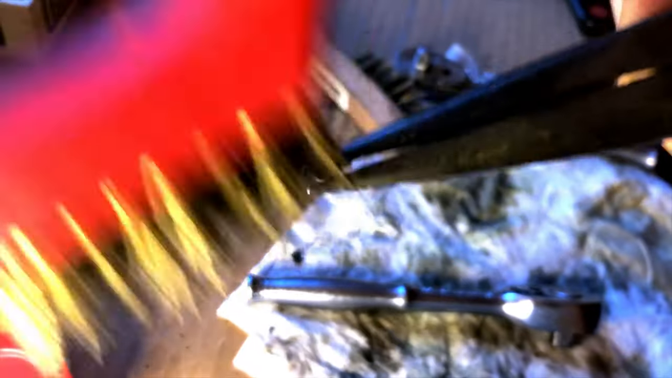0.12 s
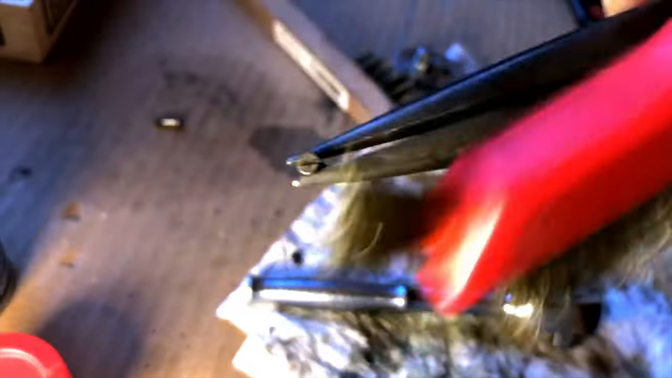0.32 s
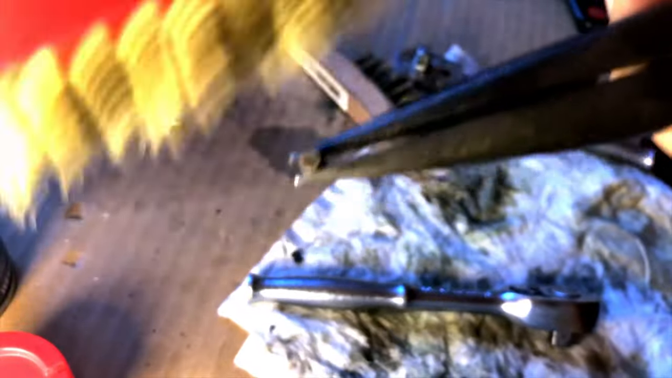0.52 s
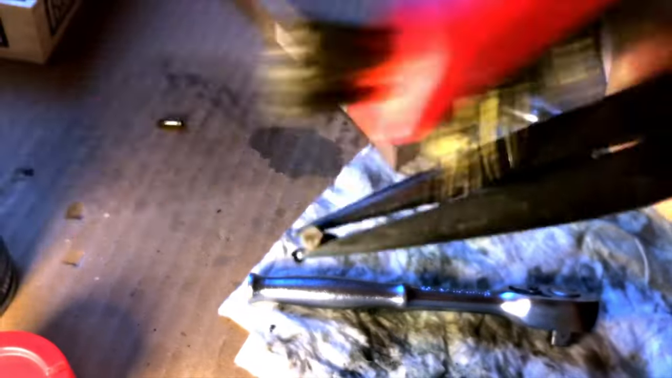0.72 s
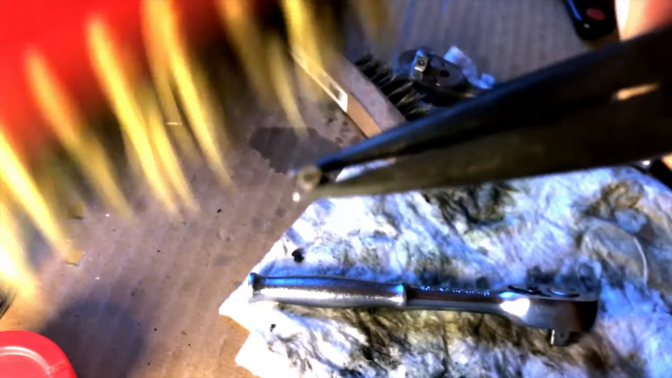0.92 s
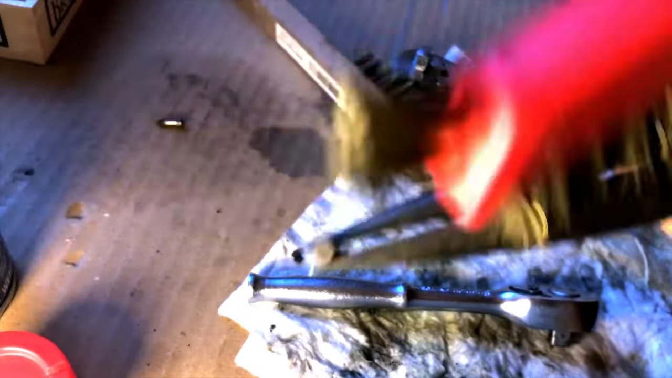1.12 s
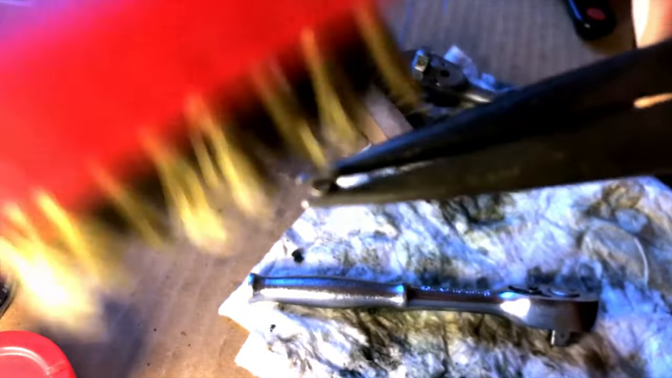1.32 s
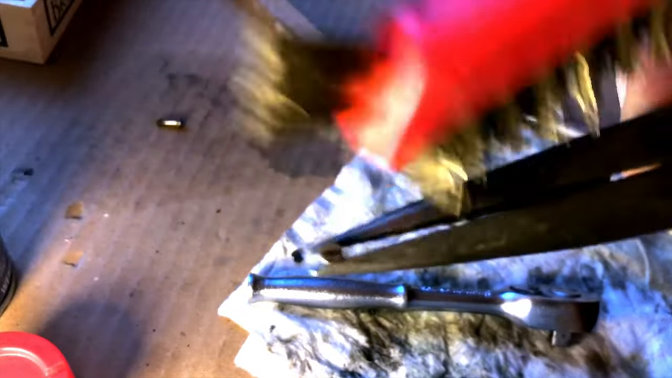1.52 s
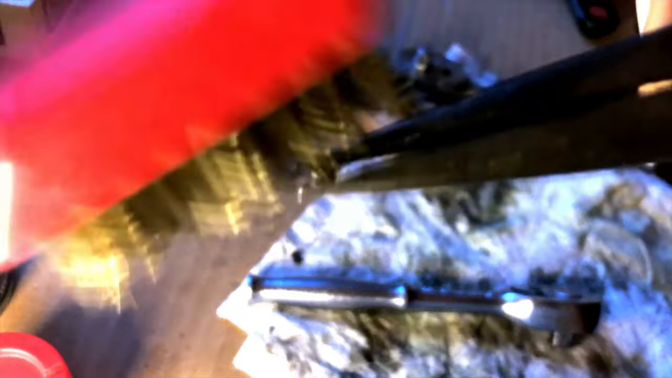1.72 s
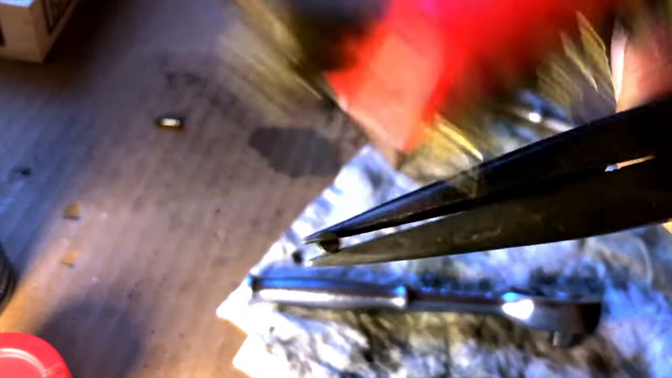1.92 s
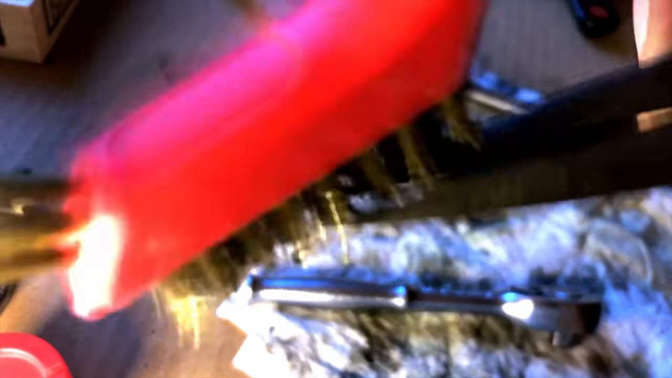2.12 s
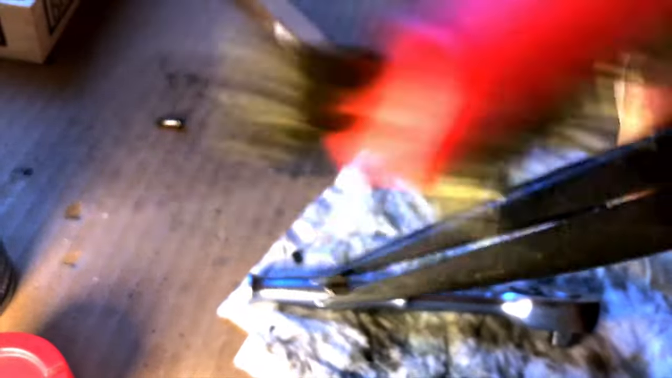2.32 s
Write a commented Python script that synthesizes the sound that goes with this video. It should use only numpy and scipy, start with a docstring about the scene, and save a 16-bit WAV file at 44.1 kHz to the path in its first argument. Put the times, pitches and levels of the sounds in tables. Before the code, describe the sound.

A wire brush scrubs a tiny metal screw gripped in pliers, close and dry. Faint bristle flicks come at 0.15 s, then a hard, loud click at 0.22 s with a dull juddering drag until about 0.33 s. Five bright scratchy strokes land at 0.6, 1.0, 1.38, 1.74 and 2.13 s, the last landing strongest; each ticks, rasps about 0.15 s and fades into low room drone with faint hiss.

```python
"""A low room drone with faint hiss, filtered noise, lies under a wire brush scrubbing a tiny screw in pliers.
Stray wires graze the screw: short bells of wire flicks. Then the brush hits the pliers with a hard click
(damped sines, noise crack, thud), drags dully along them (juddering noise) and slips off.
Five strokes follow: each lands with a tick (noise burst) that rings the pliers (short sine),
then scratches across the screw (dense random wire flicks) and thins out."""
import sys
import numpy as np
from scipy import signal
from scipy.fft import rfft, irfft, next_fast_len
from scipy.io import wavfile
from scipy.ndimage import map_coordinates

SR = 44100
rng = np.random.default_rng(int(sys.argv[2]) if len(sys.argv) > 2 else 0)


def master_out(mix):
    """Clip the mix to full scale and print it as 16-bit PCM to the path in sys.argv[1]."""
    frames = np.transpose(np.atleast_2d(mix))
    ceiling = np.clip(frames, -1, 1)
    pcm = np.round(ceiling * 32767).astype(np.int16)
    wavfile.write(sys.argv[1], SR, pcm)


N = 110250

TIME = np.arange(N) / SR
SIZE = next_fast_len(N + 8192)
FREQ = np.fft.rfftfreq(SIZE, 1 / SR)


def amp(db):
    """Decibels to gain."""
    return 10 ** (np.asarray(db) / 20)


def unit(x):
    """Scale to rms 1."""
    return x / np.sqrt(np.mean(x ** 2) + 1e-20)


def along(points):
    """Spectrum in dB: (Hz, dB) points joined on a log frequency axis."""
    hz, db = np.transpose(points)
    return np.interp(np.log(FREQ + 1), np.log(hz + 1), db)


def noise():
    """White noise, rms 1."""
    return rng.standard_normal(N)


def coloured(x, spectrum_db):
    """Filter x with a spectrum scaled to keep the power of white noise."""
    return irfft(rfft(x, SIZE) * unit(amp(spectrum_db)), SIZE)[:N]


def wander(position):
    """Smooth random curve, one knot per whole position."""
    return map_coordinates(rng.standard_normal(size=2048), [position], mode="wrap")


def swell(s, rise_s, fall_s):
    """Bell-shaped contact peaking at s."""
    width_s = np.where(TIME < s, rise_s, fall_s)
    return np.exp(-((TIME - s) / width_s) ** 2)


def decay(s, t60_s):
    """Damping: starts at s, falls 60 dB in t60_s."""
    return (TIME >= s) * np.exp(-np.log(1000) * np.maximum(TIME - s, 0) / t60_s)


# room drone: frequency_hz, relative_density_db
ROOM_SPECTRUM = [(20, -21.5), (40, -26), (62, -13), (85, -17.5), (115, -8), (152, 0.5), (190, -2),
                 (330, -7), (450, -18), (680, -27.5), (1000, -20.5), (1350, -20.5), (2000, -32.5),
                 (4000, -41.5), (8000, -48.5), (16000, -54)]
ROOM_DB = -43.5


def room():
    """Steady low drone with faint hiss: stationary filtered noise."""
    return amp(ROOM_DB) * coloured(noise(), along(ROOM_SPECTRUM))


WIRES_PER_S, WIRE_SCATTER_DB = 2400, 3
HISS_SHARE = 0.28  # power share of smooth friction


def wires(spectrum_db):
    """Random wire flicks of uneven size over smooth friction, about rms 1."""
    struck = rng.random(N) < WIRES_PER_S / SR
    sign = rng.choice([-1, 1], N)
    flicks = struck * sign * amp(WIRE_SCATTER_DB * noise())
    mix = np.sqrt(1 - HISS_SHARE) * unit(flicks) + np.sqrt(HISS_SHARE) * noise()
    return coloured(mix, spectrum_db)


# resonances and dips of screw and jaws: centre_hz, width_hz, lift_db
STEEL_RESONANCES = [(4180, 300, 6), (5850, 350, 4.5), (6820, 200, -2.5), (8070, 230, 3), (8920, 220, -7.5),
                    (9740, 380, 4.5)]
COLOUR_STEP_HZ = 257.2
GRIP_COLOUR_DB, LAND_COLOUR_DB = 1.05, 0.5  # every contact meets other wires


def steel(vary_db):
    """Resonances of screw and jaws in dB, redrawn slightly at each call."""
    modes = sum(db * np.exp(-((FREQ - hz) / width_hz) ** 2) for hz, width_hz, db in STEEL_RESONANCES)
    return modes + vary_db * wander(FREQ / COLOUR_STEP_HZ)


# light wire touch: frequency_hz, relative_db
LIGHT_TOUCH_SPECTRUM = [(60, -47), (700, -19.5), (1300, -1), (4000, -9), (6000, -6), (8000, -7.5),
                        (9900, -2), (12000, -4.5), (16000, -5.5)]
# stray wire contacts: peak_s, level_db, half_width_s
GRAZE_EVENTS = [(.1540, -42.5, .0018), (0.165, -47.5, 0.0048), (.208, -50, 0.02), (.326, -58.5, 0.0049),
                (.369, -52.5, 0.00383), (0.737, -44.5, 0.0075), (.774, -61.5, .007), (.9953, -35, 0.0011),
                (1.761, -39, 0.00265), (1.867, -37, .002)]


def grazes():
    """Stray wires flick the screw: bell-shaped contacts gate wire flicks."""
    touch = sum(amp(db) * swell(s, half_width_s, half_width_s) for s, db, half_width_s in GRAZE_EVENTS)
    return touch * wires(along(LIGHT_TOUCH_SPECTRUM) + steel(GRIP_COLOUR_DB))


CLICK_S = 0.217
CHATTER_HZ, CHATTER_DB = 169, 1.5  # tufts catch and slip
# rub along the pliers: frequency_hz, relative_db
DRAG_SPECTRUM = [(60, -49), (200, -19.5), (800, -17), (1150, -1.5), (1450, -2), (1900, -11), (3000, -17.5),
                 (4300, -22.5), (6000, -27.5), (10000, -45), (16000, -74.5)]
DRAG_START_S, DRAG_FULL_S, DRAG_EASE_S, DRAG_END_S, DRAG_DB = 0.21, 0.24, 0.285, 0.33, -34.5
DRAG_CHATTER_HZ, DRAG_CHATTER_DB = 259.4, 2.5  # brush sticks and slips on the pliers
SLIP_S, SLIP_HALF_WIDTH_S, SLIP_DB = 0.323, 0.0017, -32  # small bump ends the drag
DRAG_TAIL_DB, DRAG_TAIL_T60_S = -42, 0.17  # rub dies away as the brush lifts
TRAIL_END_S, TRAIL_DB = 0.372, -59  # wires trail over the screw


def drag():
    """Stick-slip friction judders filtered noise along the pliers; a bump, a tail and trailing wires."""
    pressure = np.interp(TIME, [DRAG_START_S, DRAG_FULL_S, DRAG_EASE_S, DRAG_END_S], [0, 1, 1, 0])
    judder = unit(amp(DRAG_CHATTER_DB * wander(TIME * DRAG_CHATTER_HZ)))
    slip = amp(SLIP_DB) * swell(SLIP_S, SLIP_HALF_WIDTH_S, SLIP_HALF_WIDTH_S)
    tail = amp(DRAG_TAIL_DB) * decay(SLIP_S, DRAG_TAIL_T60_S)
    rub = amp(DRAG_DB) * pressure * judder + slip + tail
    trailing = (TIME > CLICK_S) * (TIME < TRAIL_END_S)
    trail = trailing * amp(TRAIL_DB + CHATTER_DB * wander(TIME * CHATTER_HZ))
    trail_wires = wires(along(LIGHT_TOUCH_SPECTRUM) + steel(GRIP_COLOUR_DB))
    return coloured(rub * noise(), along(DRAG_SPECTRUM)) + trail * trail_wires


# click modes: frequency_hz, level_db, t60_s
CLICK_MODES = [(328, -23.5, .012), (900, -18.5, 0.0036), (1370, -6.5, .008), (1990, -18, 0.013),
               (3150, 1, 0.0036), (4045, -8, .008), (7340, -21.5, 0.0058), (9880, -25.5, 0.013)]
# click noise: frequency_hz, relative_db
CRACK_SPECTRUM = [(200, -14), (650, -11), (1100, 2), (4000, -7), (4600, -2.5), (8000, -7), (11000, -27.5),
                  (16000, -21)]
CRACK_DB, CRACK_T60_S, CLICK_LOW_HZ = -13.5, 0.013, 210
# hand and pliers give a moment later
THUD_DELAY_S, THUD_DB, THUD_HZ, THUD_T60_S = 0.00362, -18, 318, 0.022


def click():
    """Hard back of the brush strikes the pliers: noise crack, quickly damped modes, small thud."""
    t = TIME - CLICK_S
    ring = np.zeros(N)
    for k, (hz, db, t60_s) in enumerate(CLICK_MODES):
        polarity = (-1) ** k
        ring += polarity * amp(db) * decay(CLICK_S, t60_s) * np.sin(2 * np.pi * hz * t)
    crack = amp(CRACK_DB) * decay(CLICK_S, CRACK_T60_S) * coloured(noise(), along(CRACK_SPECTRUM))
    thud_tone = np.sin(2 * np.pi * THUD_HZ * (t - THUD_DELAY_S))
    thud = amp(THUD_DB) * decay(CLICK_S + THUD_DELAY_S, THUD_T60_S) * thud_tone
    highpass = signal.butter(2, CLICK_LOW_HZ, "highpass", fs=SR, output="sos")
    return signal.sosfilt(highpass, ring + crack + thud)


TILT_PIVOT_HZ = 5000


def tilt(db_per_octave):
    """Brighter or duller, by the angle of the wires."""
    return db_per_octave * np.log2((FREQ + 1) / TILT_PIVOT_HZ)


# wires hitting the screw: frequency_hz, relative_db
LANDING_SPECTRUM = [(60, -50), (300, -1), (900, -15.5), (1500, -11), (2000, -14), (2700, 1.5), (3400, 0),
                    (4300, -7.5), (5200, -7), (6200, -3), (8200, -1.5), (10500, -2), (13000, -7),
                    (16000, -12)]
# landings: peak_s, wire_db, rise_s, tilt_db_per_octave, ring_db, ring_hz
LANDING_EVENTS = [(0.5978, -31, .003, 2.5, -31, 1284), (1.0010, -25.5, 0.00224, -2.16, -19.5, 1250),
                  (1.3766, -27.5, 0.002, 3.5, -25.5, 1385), (1.741, -28.5, 0.0019, 6.2, -25.5, 1277),
                  (2.1320, -18, .0011, 0.8, -15.5, 1322)]
LAND_FALL_S = 0.003
SETTLE_DB, SETTLE_T60_S = -13, 0.04  # wires quiver on, relative to the landing
RING_T60_S, RING_SWELL_S, RING_LEAD_S = 0.014, 0.0019, 0.001  # pliers, damped by the hand


def landings():
    """Wires hit the screw within milliseconds (noise burst); the pliers ring briefly (damped sine)."""
    out = np.zeros(N)
    for s, land_db, rise_s, tilt_db, ring_db, ring_hz in LANDING_EVENTS:
        spectrum_db = along(LANDING_SPECTRUM) + tilt(tilt_db) + steel(LAND_COLOUR_DB)
        clatter = coloured(noise(), spectrum_db)
        settle = amp(SETTLE_DB) * decay(s, SETTLE_T60_S)
        impact = np.maximum(swell(s, rise_s, LAND_FALL_S), settle)
        out += amp(land_db) * impact * clatter

        peak_s = s + RING_LEAD_S
        ring_rise = swell(peak_s, RING_SWELL_S, RING_SWELL_S)
        ring = np.where(TIME < peak_s, ring_rise, decay(peak_s, RING_T60_S))
        out += amp(ring_db) * ring * np.sin(2 * np.pi * ring_hz * (TIME - s))
    return out


PATCH_DB, PATCH_HZ, PATCH_S = 2.5, 450, 0.018


def patchy(x):
    """Brief narrow flares and dips, as different wires take the load: random gain over time and pitch."""
    hz, t, z = signal.stft(x, SR, nperseg=256)
    knots = rng.standard_normal(size=(128, 512))
    position = np.meshgrid(hz / PATCH_HZ, t / PATCH_S, indexing="ij")
    field = map_coordinates(knots, position, mode="wrap")
    return unit(signal.istft(z * amp(PATCH_DB * field), SR, nperseg=256)[1][:N])


# wires on the screw: frequency_hz, relative_db
SCRATCH_SPECTRUM = [(60, -50), (200, -26.5), (700, -17), (1200, -3.5), (2200, -3.5), (3500, -7), (4800, -6),
                    (6500, -4), (9000, -2.5), (12000, -3), (14000, -6.5), (16000, -6.5)]
# rasp of the pliers: frequency_hz, relative_db
RASP_SPECTRUM = [(60, -55), (300, -18), (750, -11.5), (1100, -3), (1350, 5.5), (1800, -25), (3000, -10),
                 (8000, -44.5)]
# scratches: start_s, level_db, bite_s, hold_s, contact_s, fade_db, tilt_db_per_octave, rasp_db
# (hold_s and contact_s count from start_s)
SCRATCH_EVENTS = [(.606, -39.5, 0.012, 0.053, .150, 16.5, 0.5, -49.5),
                  (1.006, -38.5, 0.0027, .054, 0.12, 14, -2, -46.5),
                  (1.381, -40, 0.0087, 0.088, .130, 12, .2, -50.5),
                  (1.75, -38.5, 0.0042, 0.094, 0.16, 12, 1.2, -47.5),
                  (2.14, -38, 0.0018, .090, .142, 14, 0.3, -45.5)]
RELEASE_S = 0.011  # last wires leave, time constant


def scratches():
    """Wires bite, scratch at full pressure, ease off and leave: pressure scales the wire flicks."""
    out = np.zeros(N)
    for s, db, bite_s, hold_s, contact_s, fade_db, tilt_db, rasp_db in SCRATCH_EVENTS:
        t = TIME - s
        grip = 1 - np.exp(-np.maximum(t, 0) / bite_s)
        ease = amp(-fade_db * np.clip((t - hold_s) / (contact_s - hold_s), 0, 1))
        release = np.exp(-np.maximum(t - contact_s, 0) / RELEASE_S)
        chatter = amp(CHATTER_DB * wander(TIME * CHATTER_HZ))
        pressure = grip * ease * release * chatter
        spectrum_db = along(SCRATCH_SPECTRUM) + tilt(tilt_db) + steel(GRIP_COLOUR_DB)
        scratch = patchy(wires(spectrum_db))
        rasp = wires(along(RASP_SPECTRUM))
        out += pressure * (amp(db) * scratch + amp(rasp_db) * rasp)
    return out


def scene():
    """All sounds close and dry, in one channel."""
    return (room() + grazes() + drag() + click() + landings() + scratches())[None]


TOP_HZ = 16000


def record(dry):
    """Band limit: nothing is kept from TOP_HZ up."""
    return irfft(rfft(dry, SIZE) * (FREQ < TOP_HZ), SIZE)[:, :N]


dry = scene()
out = record(dry)
master_out(out)
```